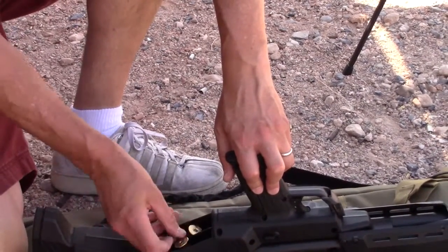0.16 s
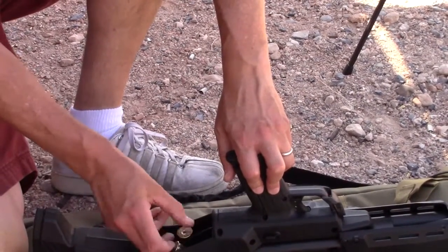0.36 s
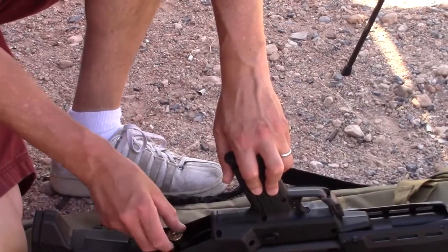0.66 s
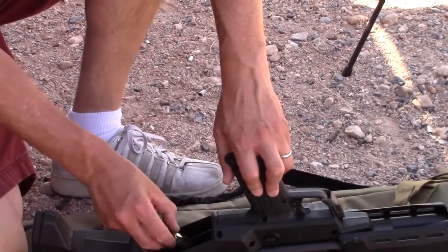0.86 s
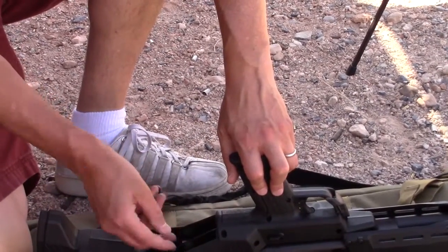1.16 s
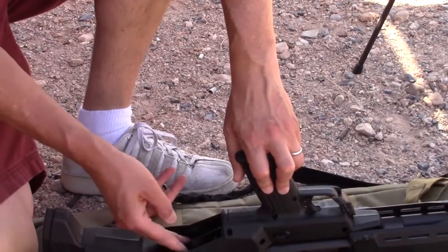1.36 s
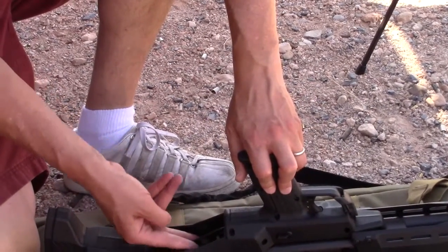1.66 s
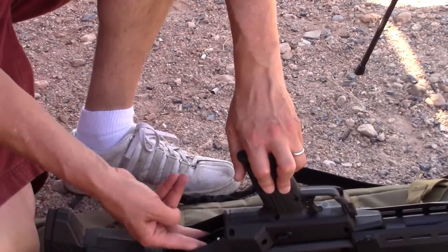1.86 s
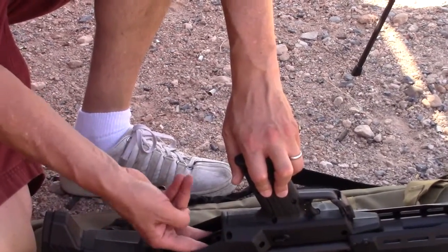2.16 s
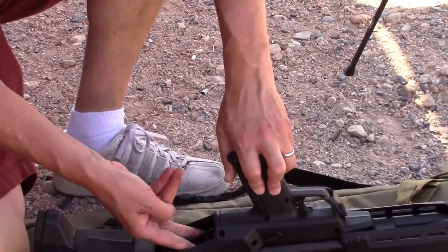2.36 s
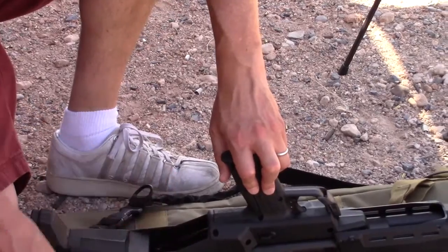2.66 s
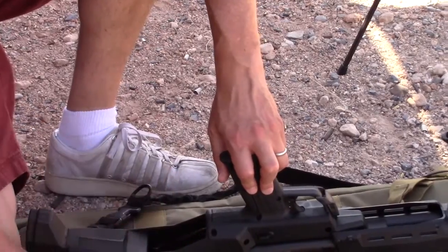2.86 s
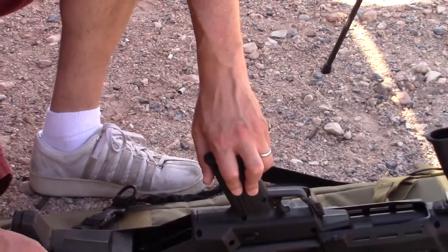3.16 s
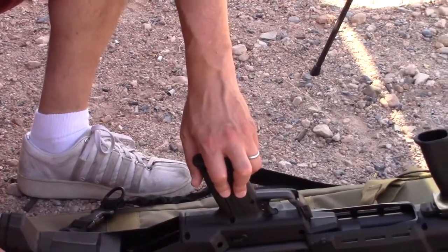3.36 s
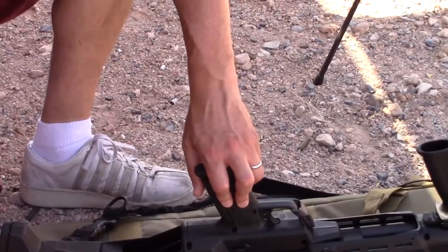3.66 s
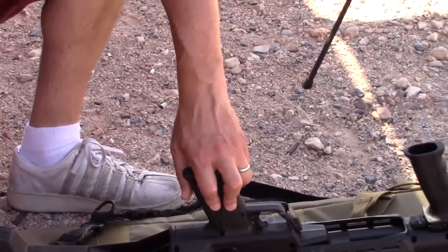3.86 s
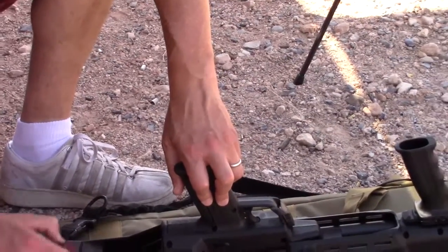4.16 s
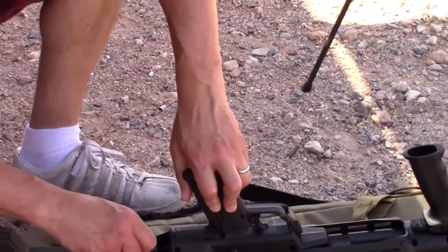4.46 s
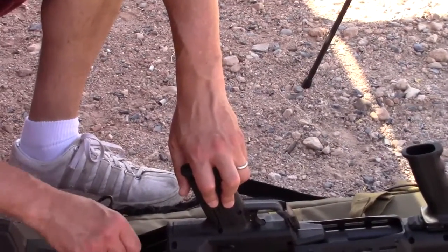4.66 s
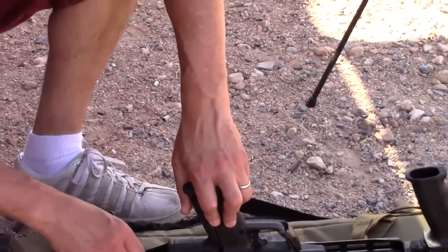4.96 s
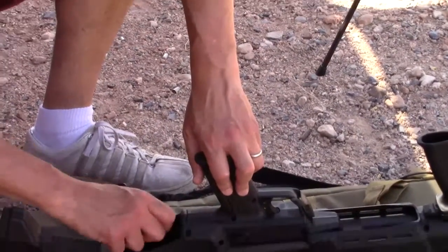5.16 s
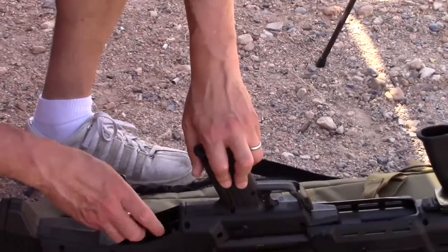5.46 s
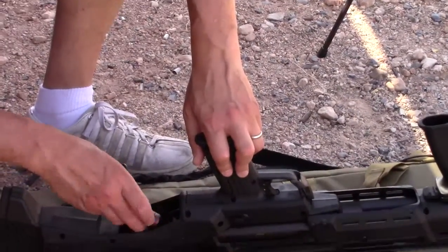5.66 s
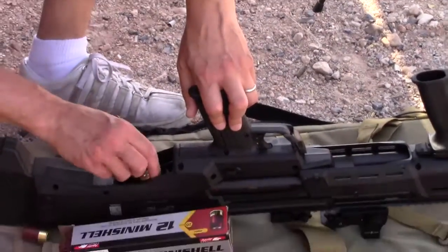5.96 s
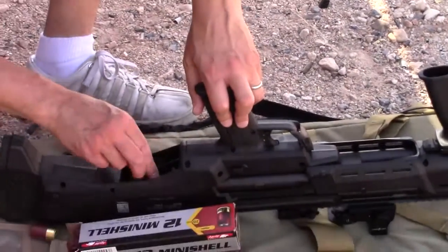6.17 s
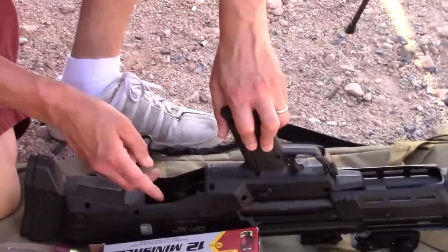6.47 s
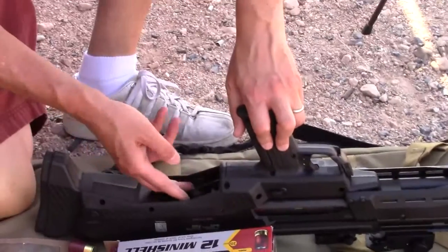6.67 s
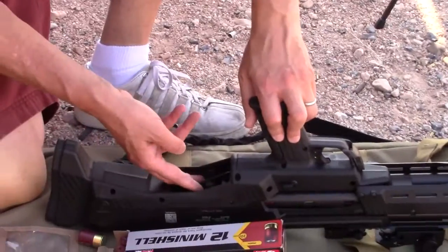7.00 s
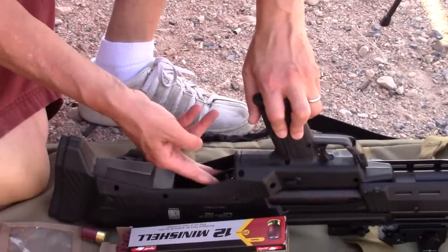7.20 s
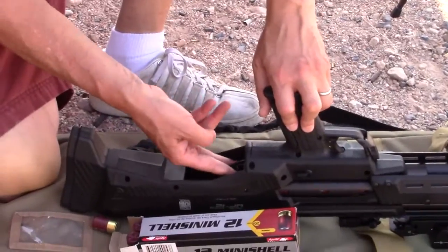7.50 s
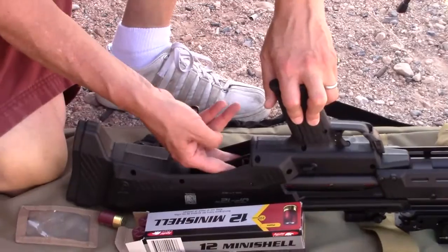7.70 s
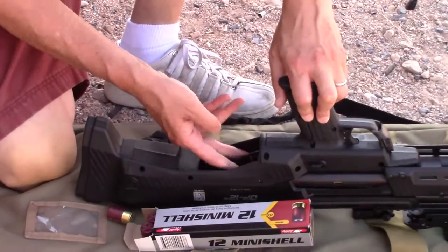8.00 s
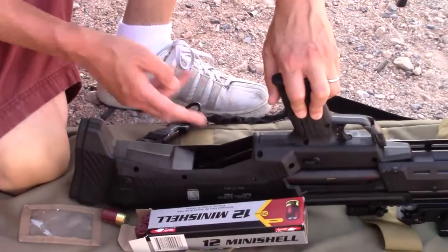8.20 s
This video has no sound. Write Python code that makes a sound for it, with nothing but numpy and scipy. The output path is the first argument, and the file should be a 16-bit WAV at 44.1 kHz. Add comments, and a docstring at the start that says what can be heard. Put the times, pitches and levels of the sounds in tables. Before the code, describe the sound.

Near, central and detailed: irregular clicks and dull hand knocks on a hollow polymer gun, a springy rasp and a ringing metal snap. Low gusts thump the microphone while a hand digs among shells in a small box. Then a hard clack with a thud, hull taps and scrapes, and another slide and latch snap. Soft outdoor air, a short scattered reflection under a shelter.

```python
"""Shotgun shells are thumbed into the magazine tubes of a polymer-stocked gun lying on a mat outdoors.
Over quiet air and a distant breeze (filtered noise), shells click, scrape and tap at the port from the start.
Near 2 s a shell slides in against the spring (noise through resonances) and the steel latch snaps and rings.
Then gusts bump the microphone, an arm brushes cloth, the cardboard box is bumped and fingers dig in it.
Just after 7 s another shell slides in and the latch snaps again; the shelter answers the gun briefly throughout."""
import sys
import numpy as np
from scipy import signal
from scipy.fft import rfft, irfft, next_fast_len
from scipy.io import wavfile
from scipy.ndimage import map_coordinates

SR = 44100
rng = np.random.default_rng(int(sys.argv[2]) if len(sys.argv) > 2 else 0)


def unload_wav(signal):
    """Save mono or channel-first audio to the path in sys.argv[1] as 16-bit WAV at rate SR, clipped to [-1, 1]."""
    wavfile.write(
        sys.argv[1],
        SR,
        np.round(np.clip(np.atleast_2d(signal).T, -1, 1) * 32767).astype(np.int16),
    )


N = 367791
TIME = np.arange(N) / SR  # seconds since the start
AGE = np.arange(SR // 2) / SR  # seconds since a blow


def amp(db):
    """Turn decibels into gain."""
    return 10 ** (np.asarray(db) / 20)


def unit(x):
    """Scale a sound to an average (rms) strength of 1."""
    return x / np.sqrt(np.mean(x ** 2) + 1e-20)


def unit_attack(x, count=353):
    """Scale a blow to rms 1 over its first samples (353 samples last 8 ms)."""
    return x / np.sqrt(np.mean(x[:count] ** 2) + 1e-20)


def along(points, hz):
    """Read a curve of (frequency, value) points, spaced by ratio as pitch is."""
    f, v = np.transpose(points)
    return np.interp(np.log(hz + 1), np.log(f + 1), v)


def swell(rows):
    """Draw a gain curve through (time, level) rows, silent outside them."""
    return amp(np.interp(TIME, *np.transpose(rows), left=-120, right=-120))


def wobble(rate):
    """Draw a smooth random curve through the given number of random points a second."""
    return map_coordinates(rng.standard_normal(4096), [TIME * rate], mode="wrap")


def peaks(resonances, hz, base_db):
    """Gain of resonances (frequency, width, level) whose powers add to a flat base."""
    power = amp(base_db) ** 2
    for f, width, db in resonances:
        power = power + amp(db) ** 2 / (1 + (2 * (hz - f) / width) ** 2)
    return np.sqrt(power)


def coloured(x, gain):
    """Filter a sound by a gain curve, with no echo ahead of the sound (minimum phase)."""
    n = x.shape[-1]
    m = 2 * next_fast_len(n // 2 + 2048)
    cepstrum = irfft(np.log(gain(np.fft.rfftfreq(m, 1 / SR)) + 1e-6))
    # fold the mirrored half forward, so that the filter only answers after the sound
    cepstrum[1:m // 2] *= 2
    cepstrum[m // 2 + 1:] = 0
    return irfft(rfft(x, m) * np.exp(rfft(cepstrum)), m)[..., :n]


def add(track, s, sound):
    """Mix a sound into a track at time s."""
    part = track[max(round(s * SR), 0):][:len(sound)]
    part += sound[:len(part)]


def wide(spectrum, side_db):
    """Make stereo noise of rms 1 from a shared part and a left-right difference."""
    mid, side = coloured(rng.standard_normal((2, N)), lambda hz: amp(along(spectrum, hz)))
    return unit(np.array([mid + amp(side_db) * side, mid - amp(side_db) * side]))


def puff(s, width):
    """A puff of wind swells and fades evenly about its peak."""
    return 1 / np.cosh(np.clip((TIME - s) / width, -20, 20))


# Tone of still air and of the breeze: (frequency [Hz], level per Hz [dB])
AIR_TONE = [(20, -28), (60, -5), (150, -1.5), (300, -11), (550, -2.5), (1000, -7.5), (2000, -10),
            (4000, -17), (8000, -22), (12000, -28), (16000, -32)]
BREEZE_TONE = [(60, -24), (180, 1.5), (330, 5), (800, -7), (1500, -17.5), (4000, -52.5)]
# Tone of low rumble, for gusts and for dull thuds: (frequency [Hz], level per Hz [dB])
RUMBLE_TONE = [(20, -24), (45, -16), (75, -1), (110, 0), (175, -5), (280, -18.5), (600, -46), (2000, -85)]
# The breeze before its random wobble: (time [s], level [dB])
BREEZE_LEVELS = [(0.0, -62), (0.16, -59), (1.28, -58), (1.67, -58.5), (2.23, -61), (2.72, -60),
                 (3.23, -63.5), (3.74, -53.5), (4.32, -63), (4.6, -58.5), (5.41, -60.5), (5.8, -59),
                 (8.34, -61)]
# Puffs of wind, before the gust trim: (peak time [s], width [s], level [dB])
GUSTS = [(2.271, 0.026, -33.5), (2.551, 0.059, -38.5), (2.795, 0.017, -47.5), (2.865, 0.018, -38.5),
         (2.961, 0.036, -41.5), (3.07, 0.015, -44.5), (3.241, 0.069, -59.5), (4.01, 0.13, -52),
         (4.175, 0.0081, -49), (4.306, 0.01, -39), (4.445, .035, -40.5), (4.525, 0.018, -30.5),
         (4.61, 0.045, -46), (4.825, 0.013, -48.5), (4.875, 0.014, -43.5), (4.96, 0.038, -56.5)]


def outdoors(air_db=-60, gust_trim_db=-1):
    """Still air and a distant, wavering breeze are soft noise; gusts bump the microphone with low rumble."""
    air = amp(air_db) * wide(AIR_TONE, side_db=-9.5)
    breeze = swell(BREEZE_LEVELS) * amp(wobble(17)) * wide(BREEZE_TONE, side_db=-7)
    gust_power = sum((amp(db) * puff(s, width)) ** 2 for s, width, db in GUSTS)
    gusts = np.sqrt(gust_power) * wide(RUMBLE_TONE, side_db=-8)
    return air + breeze + amp(gust_trim_db) * gusts


def burst(t60, shock_db=4, shock_s=0.00053, rise_s=0.00014, size=4096):
    """Force of a blow: a hard first shock, then chatter that dies away by 60 dB in t60 seconds."""
    t = AGE[:size]
    fading = amp(-60 * t / t60) + amp(shock_db) * np.exp(-t / shock_s)
    return rng.standard_normal(size) * fading * (1 - np.exp(-t / rise_s))


# Main resonances of the receiver, before random scatter: (frequency [Hz], width [Hz], level [dB])
RECEIVER_MODES = [(310, 90, 5), (720, 54, 7), (1443, 57, 4.5), (2000, 310, 5.5), (2253, 300, -14.5),
                  (3004, 250, 1.5), (3520, 130, -6.5), (3970, 310, 0.5), (4630, 130, -4.5),
                  (5680, 110, -6.5), (7250, 400, -3.5), (8240, 400, -12), (9766, 1000, -17.5)]


def struck(spectrum, scatter_db=2, ripple_db=3, ripple_hz=130):
    """Each point of contact stirs the main and small resonances in its own proportions."""
    modes = [(hz, width, db + scatter_db * rng.standard_normal()) for hz, width, db in RECEIVER_MODES]
    thicket = ripple_db * rng.standard_normal(400)  # many small resonances

    def gain(hz):
        ripple = np.interp(hz / ripple_hz, np.arange(len(thicket)), thicket)
        return amp(along(spectrum, hz) + ripple) * peaks(modes, hz, base_db=-4.5)
    return gain


# Tone of a hollow knock and of a plastic clack: (frequency [Hz], level per Hz [dB])
KNOCK_TONE = [(100, -38.5), (220, -11.5), (320, 3), (600, -1.5), (1000, -8.5), (1600, -5), (4000, -61)]
CLACK_TONE = [(500, -47), (1050, -5.5), (1650, -4.5), (3500, 3), (5000, -3.5), (6500, -6), (10000, -47)]


def blow(knock_db, clack_db, crack_db, t60, crack_tone):
    """A blow is answered by a slow hollow knock, a clack and a short bright crack."""
    # t60 sets the pace; the three parts fade slower or faster than it
    knock = unit_attack(coloured(burst(t60 * 1.876), struck(KNOCK_TONE)))
    clack = unit_attack(coloured(burst(t60 * 1.2), struck(CLACK_TONE)))
    crack = unit_attack(coloured(burst(t60 * 0.62), struck(crack_tone)))
    return amp(knock_db) * knock + amp(clack_db) * clack + amp(crack_db) * crack


# The bright part of a click or knock: (frequency [Hz], level per Hz [dB])
CRACK_TONE = [(2500, -41), (5000, -1), (7000, 1.5), (10000, 0), (12000, -8.5), (16000, -20)]
# Dull hollow knocks: the hand bumps the stock, and at 3.389 s the cardboard box:
# (time [s], knock level [dB])
DULL_KNOCKS = [(0.0195, -38.5), (0.0595, -37), (0.075, -39.5), (0.6954, -45), (0.865, -47), (1.377, -40.5),
               (1.868, -40.5), (2.24, -35.5), (3.389, -45), (4.501, -47), (4.632, -40), (4.7612, -45.5),
               (5.0046, -50), (5.6866, -49), (5.7779, -44), (5.831, -44.5), (7.754, -41), (8.152, -51.5)]
# Shells click against the loading port: (time [s], clack level [dB], crack above the clack [dB])
PORT_CLICKS = [(0.0249, -29, 2), (0.0439, -32, -7), (0.0703, -33.5, -5), (0.0983, -37.5, -5),
               (0.118, -46.5, -5), (0.3178, -39.5, -4.5), (0.3841, -46.5, -10.5), (0.4435, -47.5, -11),
               (0.4659, -31, 4), (0.491, -45, -4), (0.7313, -63, 4.5), (0.9782, -26, -2),
               (1.3559, -36, -13), (1.371, -42.5, -0.5), (1.3933, -35, -11), (1.7256, -47.5, -10),
               (1.748, -44, -11), (2.0608, -33.5, 2), (2.216, -47, -11), (2.2355, -45, 3),
               (2.2514, -34, -0.5), (2.2575, -34.5, 4), (2.275, -51, 1), (3.932, -44, -2),
               (4.4384, -45.5, -10), (4.5177, -22, -3.5), (4.53, -26, -19), (4.548, -42, 9.5),
               (4.559, -38.5, -10), (4.827, -48.5, 0), (5.0326, -43, 8), (5.046, -47, -7),
               (5.2085, -43.5, -14), (5.2625, -35, 2), (5.6867, -59, -26.5), (5.8163, -46, -13),
               (6.0585, -39, 1.5), (6.0687, -28.5, 3.5), (6.09, -40, -1), (6.6234, -37.5, -17),
               (6.7345, -40.5, 0.5), (6.9861, -39.5, -4.5), (7.7205, -44.5, -3), (7.728, -38.5, -2),
               (7.738, -37, -6), (7.7485, -40, -2.5)]
# A middling click [dB], its base decay [s], and the rise in level that halves the decay [dB]
CLICK_DB, CLICK_T60_S, HALVING_DB = -42, 0.049, 14.5
# Hollow knock under a middling click [dB], and how many dB it gains per dB of click
BODY_DB, BODY_FOLLOWS = -48.5, 0.47


def clicks_and_knocks(dull_clack_db=-9, dull_crack_db=-16, dull_t60=0.039):
    """Shells click sharply in the port, firmer ones damped sooner by the grip; the soft hand only knocks."""
    out = np.zeros(N)
    for s, db, bright_db in PORT_CLICKS:
        firm_db = db - CLICK_DB
        body_db = BODY_DB + BODY_FOLLOWS * firm_db
        t60 = CLICK_T60_S * 2 ** (-firm_db / HALVING_DB)
        add(out, s, blow(body_db, db, db + bright_db, t60, CRACK_TONE))
    for s, db in DULL_KNOCKS:
        add(out, s, blow(db, db + dull_clack_db, db + dull_crack_db, dull_t60, CRACK_TONE))
    return out


def pressure(t, length, rise_s, fall_s):
    """A stroke builds up to t = 0, holds, and lets go."""
    before = np.maximum(-t, 0) / rise_s
    after = np.maximum(t - length, 0) / fall_s
    return np.exp(-np.minimum(before + after, 20))


def strokes(rows, rise_s, fall_s):
    """Gain of a series of strokes, whose powers add where they overlap."""
    return np.sqrt(sum((amp(db) * pressure(TIME - s, length, rise_s, fall_s)) ** 2 for s, length, db in rows))


def friction(slips_per_s, smooth_db, clump_db, clumps_per_s=160):
    """Tiny slips of uneven size on a smooth hiss, bunched where the surfaces catch."""
    slips = (rng.random(N) < slips_per_s / SR) * rng.standard_normal(N)
    hiss = amp(smooth_db) * rng.standard_normal(N)
    return (unit(slips) + hiss) * amp(clump_db * np.tanh(wobble(clumps_per_s)))


# Tone of plastic rubbing on plastic: (frequency [Hz], level per Hz [dB])
RUB_TONE = [(120, -40), (300, -3), (1000, -5.5), (1700, 2.5), (3500, -1.5), (6000, -3), (10000, -14),
            (16000, -29.5)]
# Plastic rubs on plastic: (time [s], length [s], level [dB])
RUBS = [(0.052, 0.035, -46), (0.301, 0.033, -52), (0.481, 0.053, -51.5), (0.917, 0.01, -49),
        (0.988, 0.035, -47), (1.198, .007, -53.5), (1.254, .022, -52), (1.316, 0.033, -51),
        (1.375, 0.011, -54), (1.866, 0.0094, -38), (2.232, 0.05, -37), (4.472, 0.021, -36),
        (4.522, 0.047, -38), (4.575, 0.04, -46.5), (4.779, 0.11, -52.5), (5.005, 0.029, -38.5),
        (5.048, 0.088, -45.5), (5.279, 0.019, -50.5), (5.92, 0.13, -58.5), (6.084, 0.061, -48),
        (6.462, 0.059, -62), (7.176, .014, -44), (7.529, 0.055, -47.5), (7.732, 0.01, -47),
        (7.794, 0.0039, -30)]


def scraping(size=11025, lead_s=0.02):
    """Hulls scrape on the port with tiny catching slips, each stroke at another spot."""
    out = np.zeros(N)
    grit = friction(2200, smooth_db=-3.5, clump_db=4.5)
    for s, length, db in RUBS:
        piece = np.roll(grit, -round(s * SR))[:size]
        scrape = unit(coloured(piece, struck(RUB_TONE)))
        push = pressure(AGE[:size] - lead_s, length, rise_s=0.0044, fall_s=0.0056)
        add(out, s - lead_s, amp(db) * scrape * push)  # the lead leaves room for the build-up
    return out


# Light taps that ring one hull: (time [s], level [dB], ring [Hz])
HULL_TAPS = [(0.2644, -42.5, 2390), (0.5272, -44, 3100), (0.66, -52.5, 2660), (1.4295, -39.5, 3170),
             (3.145, -55.5, 4180), (3.6164, -48.5, 3900), (3.653, -46, 1460), (3.7233, -37, 4060),
             (3.799, -56, 3640), (3.9187, -44, 4470), (4.6297, -33.5, 1880), (4.6668, -31, 1950),
             (5.191, -28, 1960), (5.4575, -51.5, 1960), (6.2156, -34, 3150), (6.2416, -43.5, 3120),
             (6.498, -55, 2080), (6.5098, -47.5, 1990), (6.946, -58.5, 2040), (7.281, -60.5, 1930),
             (8.084, -62, 1920), (8.229, -60, 2290)]


def hulls(ring_t60=0.022, tick_t60=0.027, tick_db=-3.0, ring_db=-2.0, soft_hz=9000):
    """A tapped hull gives a short tick around one damped note."""
    out = np.zeros(N)
    for s, db, hz in HULL_TAPS:
        note = np.sin(2 * np.pi * hz * AGE) * amp(-60 * AGE / ring_t60) * (1 - np.exp(-AGE / 0.0004))
        note = unit_attack(note)
        modes = [(hz * 1.08, hz * 0.24, -2), (3600, 900, -2), (7400, 1800, -12)]

        def shell(f):
            body = peaks(modes, f, base_db=-45) * f / (f + 500)  # less bass
            return body / (1 + (f / soft_hz) ** 4)  # softer treble
        tick = unit_attack(coloured(burst(tick_t60), shell))
        add(out, s, amp(db) * (amp(ring_db) * note[:len(tick)] + amp(tick_db) * tick))
    return out


# The gun is pressed into the mat and shifts on it: (time [s], length [s], level [dB])
MAT_PRESSES = [(1.45, 0.5, -55), (5.85, 0.3, -59), (7.08, 0.13, -54), (7.68, .12, -54.5)]


def mat():
    """Under the thumb's push the gun shifts on the mat with a low rustle of slips."""
    grit = friction(900, smooth_db=0.5, clump_db=5, clumps_per_s=88)
    rustle = unit(coloured(grit, lambda hz: amp(along(BREEZE_TONE, hz))))  # as low as the breeze
    return rustle * strokes(MAT_PRESSES, rise_s=0.043, fall_s=0.028)


# Tone of the latch's crack: (frequency [Hz], level per Hz [dB])
SNAP_TONE = [(2500, -40.5), (5000, -6.5), (7000, -3), (10000, -2.5), (12000, -6), (14000, -11),
             (16000, -14.5)]
# Tone of a shell sliding, also used as its rim drags on the latch: (frequency [Hz], level per Hz [dB])
SLIDE_TONE = [(120, -42.5), (300, -4), (1000, -10.5), (2000, -3.5), (4000, 0), (6000, 0.5), (9000, -2.5),
              (11000, -7), (12700, -14), (14000, -6.5), (16000, -12)]
# Ringing of latch and tube, levels before random scatter: (frequency [Hz], level [dB], fade by 60 dB [s])
STEEL_MODES = [(2023, -17.5, .08), (2970, -12.5, 0.046), (3960, -18, 0.096), (5350, -6.5, 0.039),
               (6060, -45.5, 0.27), (6256, -37, .4), (6300, -42, .3), (6720, -8.5, .09),
               (7500, -10.5, 0.082), (9130, 3.5, 0.032), (9400, -19, .05), (9600, -12.5, 0.056),
               (10350, -1.5, 0.039), (11400, -20, .06)]
# The latch is touched, or snaps home; levels before the trims and base decay of the blow:
# (time [s], knock level [dB], clack level [dB], crack level [dB], base decay [s])
LATCH_BLOWS = [(1.521, -57, -41.5, -43, 0.03), (2.0115, -41.5, -22.5, -14.5, 0.056),
               (6.0373, -45.5, -38.5, -45, 0.038), (7.0433, -56.5, -46, -48.5, 0.09),
               (7.3197, -43, -24.5, -15, 0.054), (7.7944, -37.5, -25, -17.5, 0.022)]


def latch(ring_db=-5.0, blow_db=-1, drag_db=-23, drag_s=.004, rattle_s=.003):
    """The rim drags over the latch, which snaps against the receiver and rings in many steel modes."""
    out = np.zeros(N)
    for s, knock_db, clack_db, crack_db, t60 in LATCH_BLOWS:
        ring = np.zeros(len(AGE))
        for hz, db, life in STEEL_MODES:
            # the loose latch rattles on its pin: short modes blur, the tube's long ones stay clean
            jitter = rattle_s / life * np.cumsum(rng.standard_normal(len(AGE)))
            phase = 2 * np.pi * rng.random() + jitter
            fading = amp(db + rng.normal(0, 2.1) - 60 * AGE / life)
            ring += fading * np.sin(2 * np.pi * hz * AGE + phase)
        ring = unit_attack(ring * (1 - np.exp(-AGE / 0.00046)))
        add(out, s, amp(crack_db + ring_db) * ring)
        add(out, s, amp(blow_db) * blow(knock_db, clack_db, crack_db, t60, SNAP_TONE))
        drag = unit(coloured(rng.standard_normal(len(AGE)), lambda hz: amp(along(SLIDE_TONE, hz))))
        growing = np.exp(-AGE[::-1] / drag_s)  # the drag grows until the snap
        add(out, s - len(AGE) / SR, amp(crack_db + drag_db) * drag * growing)
    return out


# Resonances of the magazine spring: (frequency [Hz], width [Hz], level [dB])
SPRING_MODES = [(3080, 160, -5), (3790, 130, 2.5), (4300, 110, 2), (7040, 320, -9), (7700, 220, -11),
                (10650, 310, -2.5), (11150, 720, 4)]
# A shell slides along the tube against the spring: (time [s], length [s], level [dB])
SLIDES = [(1.755, 0.047, -47), (1.8, 0.071, -29), (2.061, 0.02, -31.5), (6.984, .007, -50.5),
          (7.122, 0.021, -29), (7.158, 0.013, -33), (7.539, .011, -27.5), (7.57, 0.18, -59)]


def sliding(coil_db=3, coil_hz=70, drag_db=-12, drag_hz=9000):
    """The rim rasps and the spring sings in close coil modes; a duller drag leads and trails each shove."""
    coils = coil_db * rng.standard_normal(600)

    def spring(hz, base_db):
        ripple = np.interp(hz / coil_hz, np.arange(len(coils)), coils)
        return peaks(SPRING_MODES, hz, base_db) * amp(along(SLIDE_TONE, hz) + ripple)

    rasp_grit = friction(3990, smooth_db=2.5, clump_db=4.0)
    rasp = unit(coloured(rasp_grit, lambda hz: spring(hz, base_db=-15)))
    drag_grit = friction(2500, smooth_db=0, clump_db=5)
    drag = unit(coloured(drag_grit, lambda hz: spring(hz, base_db=-6) / (1 + (hz / drag_hz) ** 2)))
    shoves = strokes(SLIDES, rise_s=0.01, fall_s=0.006)
    longer_shoves = strokes(SLIDES, rise_s=0.015, fall_s=.028)
    return rasp * shoves + amp(drag_db) * drag * longer_shoves


# The gun is jolted, and at 3.388 s the cardboard box is bumped:
# (time [s], thud level [dB], hollow note level [dB])
THUDS = [(2.25, -37, -41), (2.272, -35, -39), (3.388, -66, -49), (4.518, -31.5, -54.5), (4.548, -46, -66)]


def thumps(thud_t60=0.065, hollow_hz=745, hollow_t60=0.25):
    """Dull thuds with a fading hollow note: the gun is jolted, and at 3.388 s the cardboard box is bumped."""
    out = np.zeros(N)
    for s, db, ring_db in THUDS:
        fading_noise = rng.standard_normal(len(AGE)) * amp(-60 * AGE / thud_t60)
        # dividing the frequency shifts the rumble's tone up by 15 percent
        thud = coloured(fading_noise, lambda hz: amp(along(RUMBLE_TONE, hz / 1.15)))
        note = amp(ring_db - 60 * AGE / hollow_t60) * np.sin(2 * np.pi * hollow_hz * AGE)
        add(out, s, amp(db) * unit_attack(thud, count=900) + note)
    return out


# Tone of brushed cloth and of cardboard: (frequency [Hz], level per Hz [dB])
CLOTH_TONE = [(250, -28), (600, 3.5), (1400, -19), (2400, -10), (9000, -14.5), (16000, -30)]
CARD_TONE = [(150, -20.5), (450, -3.5), (800, 9), (1300, -10.5), (2500, -11), (4300, -18), (8000, -34),
             (16000, -46)]
# The forearm brushes the shorts: (time [s], length [s], level [dB])
BRUSHES = [(2.682, 0.018, -59), (2.72, 0.038, -58.5), (2.775, 0.033, -53), (2.882, 0.007, -57.5),
           (3.02, 0.015, -63), (4.37, 0.086, -63.5)]
# Fingers dig in the cardboard box: (time [s], length [s], level of the rustle [dB])
DIGS = [(3.39, 0.0028, -34), (3.42, 0.085, -52.5), (3.63, 0.21, -54.5), (3.79, 0.19, -50),
        (4.045, 0.033, -50)]


def rummage(clink_db=-8):
    """The arm brushes cloth, fingers rustle in the cardboard box and the shells in it jostle."""
    cloth_grit = friction(2000, smooth_db=-2, clump_db=2.5)
    cloth = unit(coloured(cloth_grit, lambda hz: amp(along(CLOTH_TONE, hz))))
    card_grit = friction(290, smooth_db=4.5, clump_db=7.5, clumps_per_s=70)
    rustle = unit(coloured(card_grit, lambda hz: amp(along(CARD_TONE, hz))))
    shell_modes = [(4100, 640, 6), (4950, 480, 0), (6900, 770, -1.5)]
    shell_grit = friction(240, smooth_db=1, clump_db=13.5, clumps_per_s=45)
    clinks = unit(coloured(shell_grit, lambda hz: peaks(shell_modes, hz, base_db=-34)))
    brushing = cloth * strokes(BRUSHES, rise_s=0.0031, fall_s=0.0096)
    digging = strokes(DIGS, rise_s=.008, fall_s=0.0085) * (rustle + amp(clink_db) * clinks)
    return brushing + digging


# How long the shelter's tail lasts: (frequency [Hz], fade by 60 dB [s])
SHELTER_DECAY = [(200, 0.11), (2000, 0.4), (6000, 0.51), (10000, .13), (14000, .09)]


def shelter(x, side_db=-1, delay_s=0.0023):
    """Ground and roof send back a short scattered tail: noise that fades at its own pace in each band."""
    hz, t, z = signal.stft(rng.standard_normal((2, SR // 2)), SR, nperseg=256)
    fading = amp(-60 * t / along(SHELTER_DECAY, hz)[:, None])
    tails = signal.istft(z * fading, SR, nperseg=256)[1][:, :len(AGE)]
    tails = tails * (1 - np.exp(-(AGE / delay_s) ** 2))  # the tail swells in after the direct sound
    tails = tails / np.linalg.norm(tails[0])
    mid, side = signal.fftconvolve(x[None], tails, axes=1)[:, :N]
    return np.array([mid + amp(side_db) * side, mid - amp(side_db) * side])


def ports(x, differ_db=-21, spread_s=0.00037, size=256):
    """The gun's faces and the microphone's case scatter sound a little differently into left and right."""
    scatter = rng.standard_normal(size) * np.exp(-AGE[:size] / spread_s)
    side = amp(differ_db) * signal.fftconvolve(x, scatter / np.linalg.norm(scatter))[:N]
    return np.array([x + side, x - side])


def scene():
    """Gun, hand and box lie straight ahead, close by, with the shelter's answer and the outdoor air."""
    near = clicks_and_knocks() + scraping() + hulls() + mat() + latch() + sliding() + thumps() + rummage()
    return ports(near) + amp(-27.0) * shelter(near) + outdoors()


def record(dry, ceiling=0.98, top_hz=16000):
    """Round off the highest peaks, then cut steeply above the top frequency."""
    held = dry / (1 + np.abs(dry / ceiling) ** 6) ** (1 / 6)
    m = next_fast_len(N + SR // 2)
    steep_cut = 1 / (1 + (np.fft.rfftfreq(m, 1 / SR) / top_hz) ** 160)
    return irfft(rfft(held, m) * steep_cut, m)[:, :N]


dry = scene()
out = record(dry)
unload_wav(out)
```